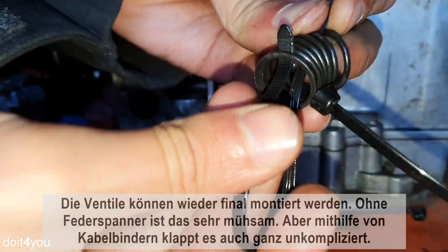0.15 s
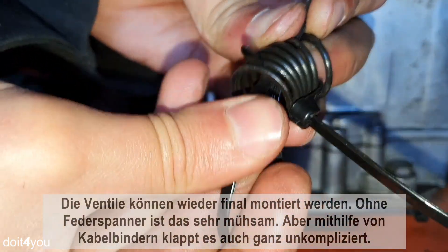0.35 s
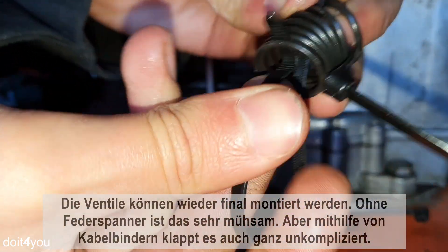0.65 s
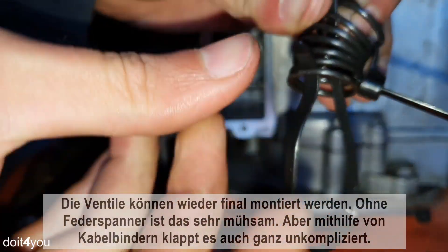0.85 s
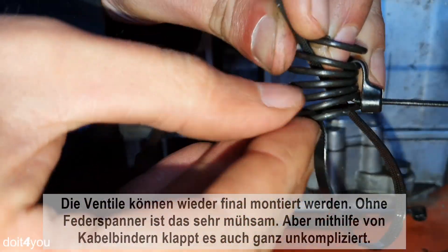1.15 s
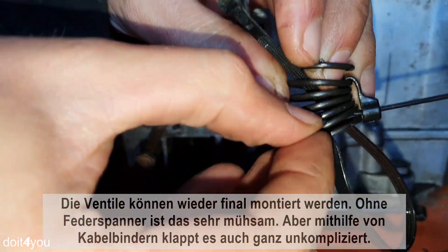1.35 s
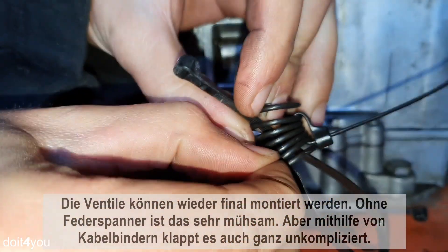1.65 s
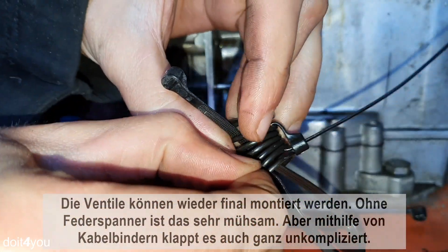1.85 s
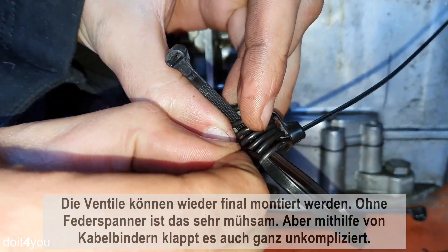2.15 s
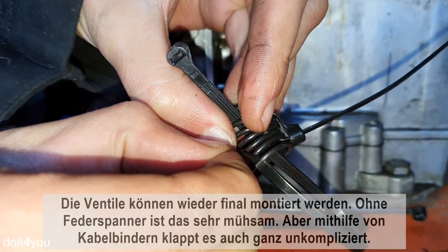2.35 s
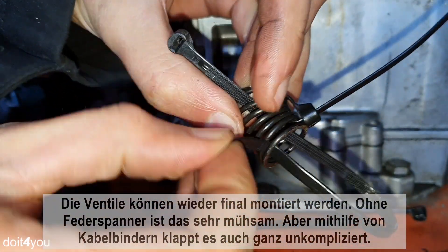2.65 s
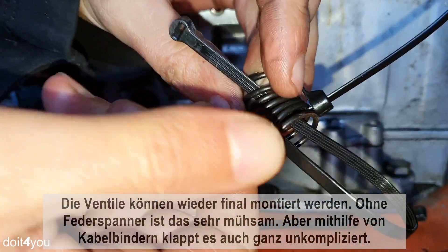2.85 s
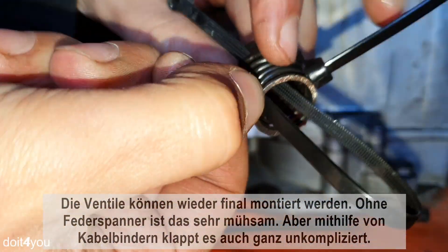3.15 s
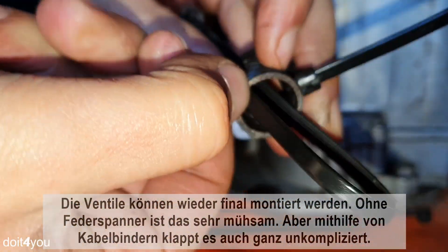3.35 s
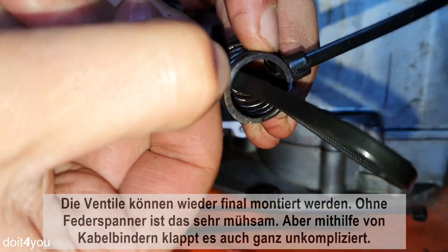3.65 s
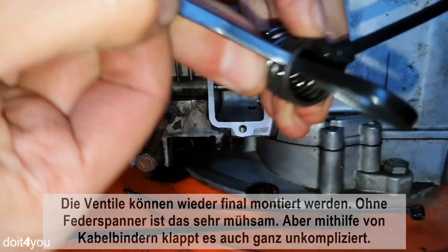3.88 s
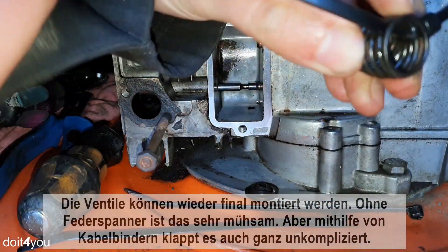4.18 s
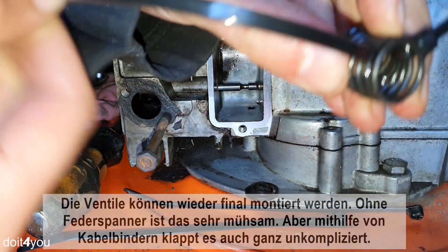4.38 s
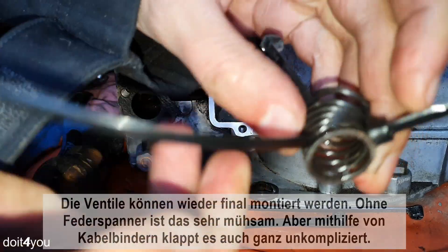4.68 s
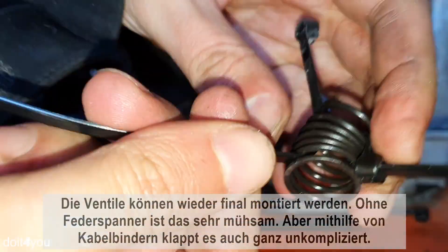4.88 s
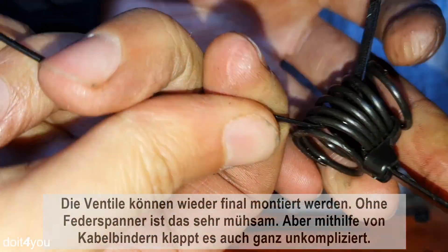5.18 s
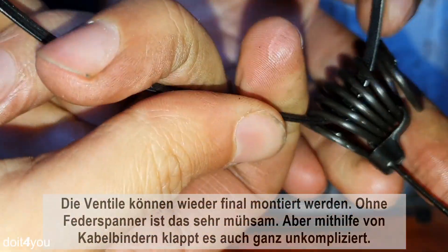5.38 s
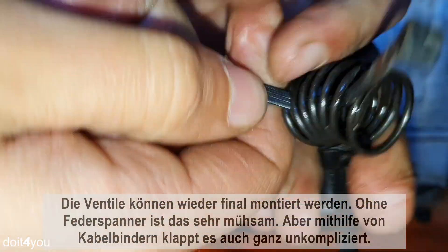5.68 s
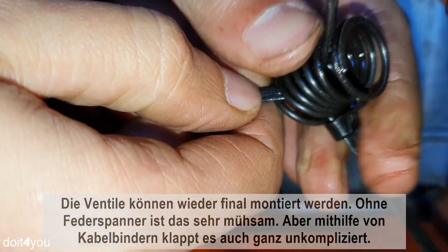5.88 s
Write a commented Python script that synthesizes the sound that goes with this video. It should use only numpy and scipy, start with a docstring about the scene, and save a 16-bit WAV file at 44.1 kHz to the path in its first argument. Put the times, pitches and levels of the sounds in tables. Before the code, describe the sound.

Plastic straps and lock heads click irregularly as they slip off the coils of a metal spring, close to the microphone and a little to the left. After some light ticks, a cable tie gives two quick, buzzy zips, the second speeding into a whine and snapping free. Faint rubbing of skin and nylon and a late click follow. The small workshop adds a very short echo, a low rumble and faint hiss.

```python
"""A small, quiet workshop, the stereo microphone close to hands fitting nylon cable ties round a steel
valve spring, a little to the left. Straps and lock heads click as they slip off the coils. Twice a
ribbed strap is yanked through, and its teeth pluck it into a buzzing zip. Fingers and straps rub softly
in between. Behind them are a short tail off the walls, a low room rumble and faint microphone hiss."""
import sys
import numpy as np
from scipy import signal
from scipy.fft import rfft, irfft, next_fast_len
from scipy.io import wavfile
from scipy.ndimage import uniform_filter1d, map_coordinates

SR = 44100
rng = np.random.default_rng(int(sys.argv[2]) if len(sys.argv) > 2 else 0)


def put_to_file(sound):
    """Save the sound as 16-bit audio at rate SR, in the file named by the first command-line argument."""
    columns = np.atleast_2d(sound).T  # one column per channel
    safe = np.clip(columns, -1, 1)
    whole_steps = np.round(safe * 32767)
    wavfile.write(sys.argv[1], SR, whole_steps.astype(np.int16))


N = 265482

# plastic snapping on the coils: start_s, snap_db, brightness_db, thump_db, knock_hz, snap_hz, left_db
CLICKS = [ (0.2063, -30, 13, -60, 1635, 6140, 11), (0.3163, -33, 14.5, -61.5, 1600, 6060, 15),
          (0.6696, -46, 0.5, -84, 1390, 4830, 23), (1.2293, -62, 4.5, -67.5, 2370, 6030, 16),
          (1.7705, -50, 2, -54, 2250, 5950, 7), (1.8318, -59.5, -3, -53, 2500, 5130, 3),
          (1.9515, -41.5, -7.5, -41, 2400, 4420, 10.5), (1.968, -37, -1, -44, 2250, 4850, 1.5),
          (1.9727, -39, -3, -39.5, 2200, 5400, 11), (2.0799, -42.5, -1.5, -46.5, 2380, 4460, 10),
          (2.3172, -35, 3, -42.5, 2010, 4400, 4.5), (2.472, -35, 0.5, -44.5, 2070, 4100, 3),
          (2.8603, -55.5, 6.5, -69, 1870, 5440, 21), (3.205, -69.5, 4.5, -70, 2000, 4460, 13),
          (3.633, -67.5, -5.5, -69.5, 1630, 3520, 12.5), (3.6639, -48, -7.5, -49, 1690, 3530, 17),
          (3.7346, -64.5, -4, -60, 1820, 5230, 20), (3.7763, -50.5, -5, -47, 2000, 4200, 12),
          (3.844, -57.5, 2, -42.5, 1960, 4870, 14), (4.0549, -52.5, -13, -36, 1450, 4110, 16),
          (4.1547, -22.5, -2, -39.5, 2770, 5520, 21), (4.164, -37.5, 1, -36, 1530, 3130, 10.5),
          (4.5199, -53, 4, -50.5, 1670, 5130, 13), (4.5345, -52.5, 4.5, -67, 1500, 5400, 22),
          (4.631, -66.5, 0.5, -63, 1770, 4190, 5), (5.7261, -37.5, 5.5, -56, 2600, 5330, 2.5),
          (5.7364, -49, -0.5, -55, 2680, 5130, -1), (5.7828, -63, 9, -63, 2400, 4500, 5)]
# the ribbed strap on the move: time_s, teeth_per_s, unevenness (0-1), force_db
FIRST_PULL = [ (3.843, 282.4, 0.14, -49), (3.858, 265.3, 0.1, -47.5), (3.8615, 285.3, .02, -33.5),
              (3.878, 296, 0.022, -31.5), (3.893, 327, .1, -33), (3.899, 418, 0.44, -38),
              (3.922, 325, 0.19, -33.5), (3.941, 287, .4, -48)]  # creeps, runs, stutters and stops
SECOND_PULL = [ (4.054, 305.7, 0.49, -41), (4.074, 480.4, 0.43, -37.5), (4.085, 857, .03, -35.5),
               (4.1, 880, 0.018, -32.5), (4.111, 930, .02, -33.5), (4.122, 1110, .03, -29),
               (4.128, 1119, .1, -36)]  # speeds up into a whine
LAST_TUG = [ (4.1308, 258, .015, -29.5), (4.1415, 344.6, 0.035, -29), (4.1455, 703, 0.25, -32),
            (4.153, 1007, 0.2, -32.5), (4.16, 420, 0.42, -48.5), (4.168, 315, 0.28, -58)]  # then catches, tears through and comes to rest
# fingers and straps sliding: start_s, slacken_s (per 10 dB), level_db
STROKES = [ (0.682, .3, -64.5), (1.22, 0.71, -70.5), (1.68, 0.35, -73.5), (2.67, .45, -68),
           (3.67, 0.74, -70.5), (4.41, 0.25, -67), (4.49, 0.13, -61.5), (4.8, 0.57, -72), (5.04, 0.35, -70),
           (5.675, 0.48, -63.5), (5.92, 0.098, -62)]
# strap dragged over wire: middle_s, length_s, pitch_hz, level_db
SCUFFS = [ (1.118, 0.21, 2710, -77.5), (3.781, 0.2, 1900, -70.5), (4.47, 0.12, 3950, -62.5),
          (4.73, 0.22, 1850, -74), (5.1, .24, 1870, -73.5), (5.06, 0.21, 1260, -73.5),
          (5.952, 0.14, 1840, -73)]
# the room's low background: time_s, rumble_db, drone_db (both before their lift in room_tone)
ROOM_LEVELS = [(0.0, -61.5, -71.5), (2.08, -63, -69.5), (3.52, -63.5, -69), (3.92, -59.5, -64),
               (4.88, -65.5, -66), (6.02, -65, -65.5)]

# resonances of plastic on wire: multiple_of_centre, gain_db
KNOCK = [(.3, -25.5), (.62, -11.5), (.82, -1), (1, 5), (1.25, -2.5), (1.6, -16), (4, -50.5)]
SNAP = [(.25, -38.5), (.45, -14.5), (.7, -2.5), (1, 1), (1.2, -2), (1.45, -7), (2.5, -31)]
SIZZLE = [(.45, -36.5), (.7, -12), (.9, 4), (1, 3.5), (1.12, -2.5), (1.35, -7), (1.55, -13.5)]
SCUFF = [(.3, -36), (.75, -20), (.92, -1), (1.07, -10), (1.25, -22), (3, -39)]
# colours of the sources at the hands: frequency_hz, gain_db
FINGER_THUMP = [(30, -8.5), (120, 6), (300, 2), (450, -3), (720, 3), (1100, -11), (3000, -47)]
STRAP_BODY = [(50, -5), (150, -4), (290, 5), (450, -10.5), (600, -2), (850, -3.5), (1100, -7.5), (1450, 4),
              (1800, 3), (2150, 4.5), (2600, -19), (3600, -17.5), (5500, -35.5), (16000, -34.5)]
LOCK_TICK = [(1500, -26), (2600, 4), (3500, 0), (4400, -6.5), (5500, -11.5), (9000, -18.5), (16000, -25.5)]
STRAP_SCRAPE = [(1200, -19), (2800, 2), (4300, 2), (6500, 0), (7700, -13), (10000, -2.5), (13000, -1),
                (15800, -3.5)]
SKIN_RUB = [(400, -10.5), (1200, -3.5), (2500, -4), (4000, -2), (6600, -1), (7400, -13.5), (9500, -6.5),
            (11500, -7.5), (16000, -20)]
# colours of the rumble (room and hand), drone, hiss and reflections: frequency_hz, gain_db
LOW_RUMBLE = [(15, -31), (30, -15.5), (45, -4.5), (65, 0), (88, 1), (118, -12.5), (155, -6.5), (200, -15),
              (500, -64.5)]
ROOM_DRONE = [(130, -23.5), (200, -5), (248, 4), (285, -6), (330, -13), (420, -16.5), (720, -23.5),
              (1200, -47)]
MIC_HISS = [(100, 4), (1000, 8.5), (3000, 6), (6700, -7.5), (7400, -9.5), (11000, -4), (16000, -5.5)]
WALL_RETURN = [(300, -8), (1800, -9), (5000, -14), (12000, -11)]
# how long the workshop rings: frequency_hz, t60_s
WALL_DECAY = [(200, .17), (1300, .17), (4000, 0.17), (10000, 0.12), (16000, 0.11)]


def coil_clicks(chatter, chatter_t60_s=.015, slip_s=.0007, attack_s=.0051, sizzle_hz=11400):
    """A strap slips off a coil: a sharp blow and a brief chatter ring finger, strap and lock head."""
    out = np.zeros((2, N + SR))
    t = np.arange(2048) / SR
    chatter_decay = amp(-60 * t / chatter_t60_s) + np.exp(-t / slip_s)
    for start_s, snap_db, bright_db, thump_db, knock_hz, snap_hz, left_db in CLICKS:
        blow = chatter * rng.standard_normal((2, len(t))) * chatter_decay
        blow[:, 0] += 1
        # a bright click trades knock for sizzle, which reaches both microphones more evenly
        bodies = [(FINGER_THUMP, thump_db, left_db),
                  (centred(KNOCK, knock_hz), snap_db - 3.5 - bright_db, left_db),
                  (centred(SNAP, snap_hz), snap_db, left_db),
                  (centred(SIZZLE, sizzle_hz), snap_db - 6.5 + bright_db, left_db / 2)]
        for colour, body_db, lean_db in bodies:
            body = signal.fftconvolve(blow, ring(colour)[None], axes=1)[:, :len(t)]
            attack_rms = np.linalg.norm(body[:, t < attack_s], axis=1) / np.sqrt(attack_s * SR)
            body /= attack_rms[:, None]
            start = round(start_s * SR)
            out[:, start:start + len(t)] += amp(body_db) * leftward(lean_db) * body
    return out[:, :N]


def tooth_plucks(travel, teeth_per_s, uneven, scatter=.6):
    """One impulse as each tooth trips over the edge; an uneven pull makes them ragged and weaker."""
    trips = np.flatnonzero(np.diff(np.ceil(travel)) > 0)
    late, slip, size = rng.standard_normal((len(trips), 3)).T
    period = SR / teeth_per_s[trips]
    when = trips + scatter * uneven[trips] * period * late
    strength = amp(1.6 * size + 7 * uneven[trips] * (slip - 2)) * np.sqrt(period)
    taps = np.floor(when).astype(int)[:, None] + np.arange(-7, 9)
    impulses = strength[:, None] * np.sinc(taps - when[:, None])  # placed between samples
    return np.bincount(taps.ravel(), impulses.ravel(), N)


def strap_zip(pull, tick_share, delay_at_1khz_s=.00052, bind_at_s=4.131, bind_rise_s=.016, bind_db=16):
    """Teeth pluck the strap and tick in the lock head; at speed the plucks merge into a whine."""
    teeth_per_s, uneven, force_db = curves(pull)
    t = np.arange(N) / SR
    moving = (t >= pull[0][0]) & (t <= pull[-1][0])
    travel = np.cumsum(teeth_per_s * moving) / SR  # teeth passed
    plucks = tooth_plucks(travel, teeth_per_s, uneven)
    buzz = signal.fftconvolve(plucks * amp(force_db), ring(STRAP_BODY))[:N]
    # bending waves in the strap run slower at low pitch
    buzz = filtered(buzz, lambda hz: np.exp(-4j * np.pi * delay_at_1khz_s * np.sqrt(1000 * hz)))
    ticks = signal.fftconvolve(plucks, ring(LOCK_TICK))[:N]
    # each tooth's flank scrapes just after it catches
    flank = np.zeros(N)
    flank[moving] = unit(np.exp(-4 * (travel[moving] % 1)))
    rasp = flank * noise(STRAP_SCRAPE, alike=.33)
    clean = np.clip(tick_share - uneven, 0, 1)
    binding = np.clip((t - bind_at_s) / bind_rise_s, 0, 1)  # a tight strap scrapes harder
    scrape_db = force_db - 13.5 + bind_db * binding
    scrape = amp(scrape_db) * (np.sqrt(clean) * ticks + np.sqrt(1 - clean) * rasp)
    # the pulling hand shudders with the load
    load = uniform_filter1d(amp(force_db - 14) * moving, size=1200)
    shudder = load * noise(LOW_RUMBLE, alike=.74)
    return buzz * leftward(db=18.5) + (scrape + shudder) * leftward(db=4)


def finger_rub(grip_db=-85, rise_s=.02, grain_db=2, drift_db=1, catches_per_s=7.3, catch_db=25):
    """Skin and nylon slide in strokes, with a fine, uneven grain and now and then a tiny catch."""
    t = np.arange(N) / SR
    power = amp(grip_db) ** 2  # the fingers never lie quite still
    for start_s, slacken_s, level_db in STROKES:
        rise = np.exp(np.minimum(t - start_s, 0) / rise_s)
        slackening = amp(level_db - 10 * np.maximum(t - start_s, 0) / slacken_s)
        power = power + (rise * slackening) ** 2
    grain = unit(amp(grain_db * wobble(410) + drift_db * wobble(14)))
    caught = rng.random(N) < catches_per_s / SR
    catches = caught * amp(catch_db + 1.5 * rng.standard_normal(N))
    slide = grain * noise(SKIN_RUB, alike=.22) + signal.fftconvolve(catches, ring(STRAP_SCRAPE))[:N]
    return np.sqrt(power) * slide * leftward(db=12)


def wire_scuffs():
    """A strap dragged over the wire sings briefly in one narrow band."""
    t = np.arange(N) / SR
    out = np.zeros((2, N))
    for middle_s, length_s, pitch_hz, level_db in SCUFFS:
        swell = np.exp(-(2 * (t - middle_s) / length_s) ** 2)
        out += amp(level_db) * swell * noise(centred(SCUFF, pitch_hz), alike=.25)
    return out * leftward(db=13.5)


def wall_reflections(sound, gap_s=.003):
    """The workshop's walls return a short tail, different at each microphone."""
    hz, t, spectrum = signal.stft(rng.standard_normal((2, SR // 3)), SR, nperseg=256)
    decay = amp(-60 * t / along(WALL_DECAY, hz)[:, None])
    _, tail = signal.istft(spectrum * decay, SR, nperseg=256)
    tail = np.pad(tail / np.linalg.norm(tail[0]), ((0, 0), (round(gap_s * SR), 0)))
    reflected = signal.fftconvolve(sound.mean(axis=0)[None], tail, axes=1)[:, :N]
    return filtered(reflected, lambda hz: amp(along(WALL_RETURN, hz)))


def room_tone(rumble_lift_db=2.5, drone_lift_db=4, hiss_db=-84):
    """Low rumble, a wavering drone and faint microphone hiss."""
    rumble_db, drone_db = curves(ROOM_LEVELS)
    rumble = amp(rumble_db + rumble_lift_db) * noise(LOW_RUMBLE, alike=.94)
    drone = amp(drone_db + drone_lift_db + .55 * wobble(6.4)) * noise(ROOM_DRONE, alike=.76)
    hiss = amp(hiss_db) * noise(MIC_HISS, alike=.067)
    return rumble + drone * leftward(db=4) + hiss


def amp(db):
    """Decibels to gain."""
    return 10 ** (np.asarray(db) / 20)


def unit(x):
    """Scale to rms 1."""
    return x / np.sqrt(np.mean(x ** 2) + 1e-20)


def leftward(db):
    """Channel gains with the right microphone weaker by db."""
    return np.array([[1], [amp(-db)]])


def along(points, hz):
    """Rows of frequency_hz, value read on a log frequency axis."""
    knots_hz, values = np.transpose(points)
    return np.interp(np.log(hz + 1), np.log(knots_hz + 1), values)


def curves(rows):
    """One value per sample for each column after the time."""
    time_s, *columns = np.transpose(rows)
    return [np.interp(np.arange(N) / SR, time_s, column) for column in columns]


def centred(shape, hz):
    """A resonance shape placed on its centre frequency."""
    return np.array(shape) * [hz, 1]


def filtered(x, response):
    """Filter x by a response given as a function of frequency."""
    size = next_fast_len(N + SR // 4)
    return irfft(rfft(x, size) * response(np.fft.rfftfreq(size, 1 / SR)), size)[..., :N]


def ring(colour, size=1024):
    """The causal impulse response of a colour, with energy 1."""
    gain = amp(along(colour, np.fft.rfftfreq(size, 1 / SR)))
    cepstrum = irfft(np.log(gain))
    cepstrum[1:size // 2] *= 2
    cepstrum[size // 2 + 1:] = 0
    response = irfft(np.exp(rfft(cepstrum)))
    return response / np.linalg.norm(response)


def noise(colour, alike):
    """Coloured stereo noise of rms 1; alike is the share of power common to both microphones."""
    common = np.sqrt(alike) * rng.standard_normal(N)
    separate = np.sqrt(1 - alike) * rng.standard_normal((2, N))
    return unit(filtered(common + separate, lambda hz: amp(along(colour, hz))))


def wobble(knots_per_s):
    """A smooth random curve."""
    knots = rng.standard_normal(int(N * knots_per_s / SR) + 4)
    return map_coordinates(knots, [np.arange(N) * knots_per_s / SR])


def scene(right_lag_s=.00022, click_send_db=-1, slide_send_db=-7):
    """The hands work nearer to the left microphone, so the right one hears them a little later."""
    sliding = finger_rub() + wire_scuffs()
    sliding += strap_zip(FIRST_PULL, tick_share=.51)
    sliding += strap_zip(SECOND_PULL, tick_share=.52) + strap_zip(LAST_TUG, tick_share=.74)
    left, right = coil_clicks(chatter=.45) + sliding
    right = filtered(right, lambda hz: np.exp(-2j * np.pi * hz * right_lag_s))
    # the walls gather a click from all directions, which evens out its fine colour
    radiated = amp(click_send_db) * coil_clicks(chatter=.03)
    shielded = amp(slide_send_db) * sliding  # the fingers screen the sliding strap from the walls
    return np.array([left, right]) + wall_reflections(radiated + shielded) + room_tone()


def record(dry, top_hz=16000):
    """The camera behind the microphone keeps nothing above its band limit."""
    return filtered(dry, lambda hz: 1 / np.sqrt(1 + (hz / top_hz) ** 120))


dry = scene()
out = record(dry)
put_to_file(out)
```